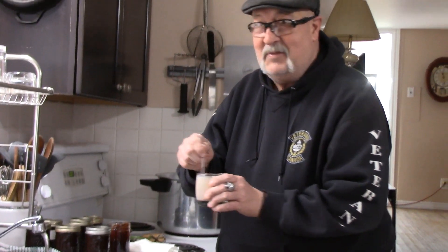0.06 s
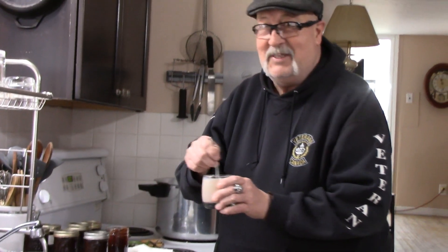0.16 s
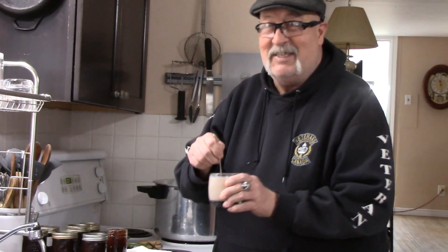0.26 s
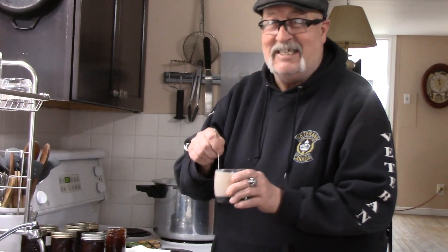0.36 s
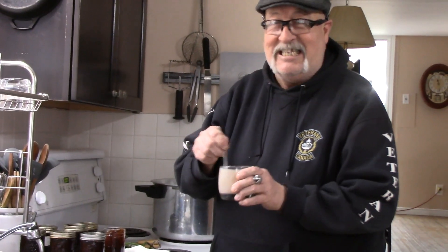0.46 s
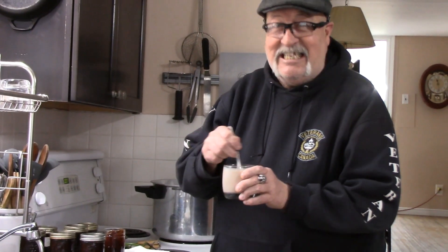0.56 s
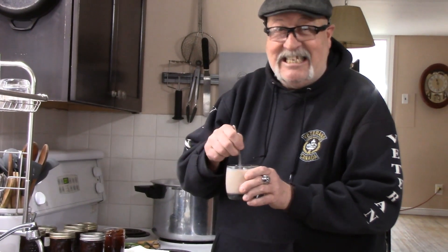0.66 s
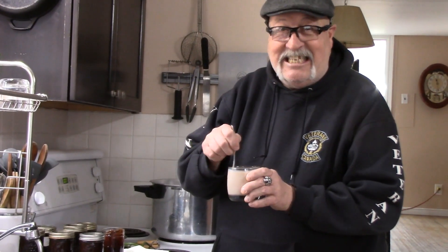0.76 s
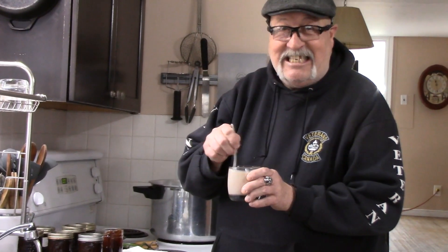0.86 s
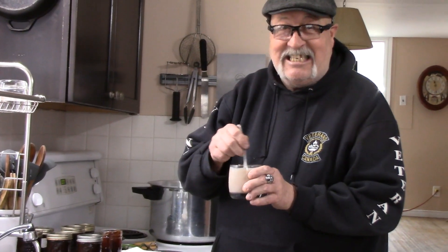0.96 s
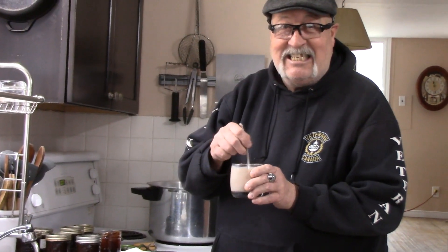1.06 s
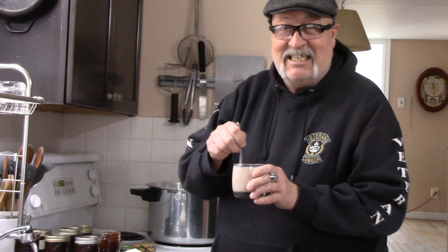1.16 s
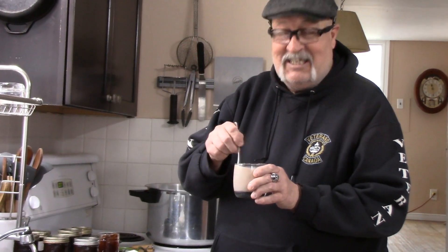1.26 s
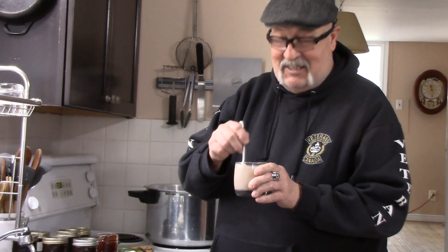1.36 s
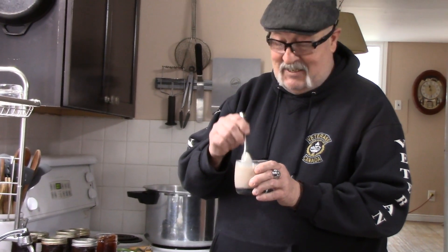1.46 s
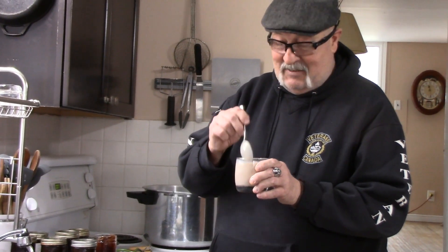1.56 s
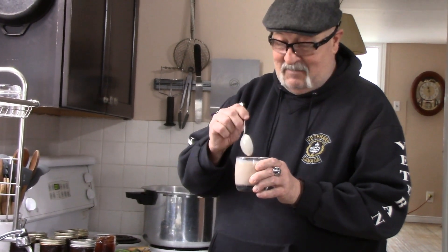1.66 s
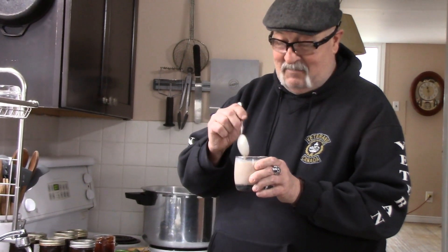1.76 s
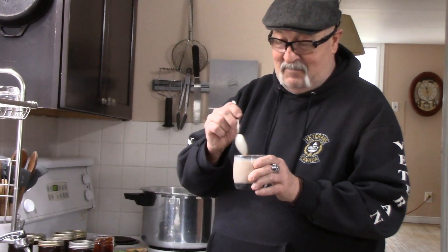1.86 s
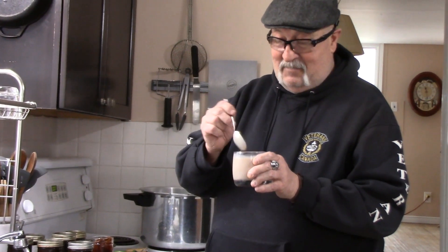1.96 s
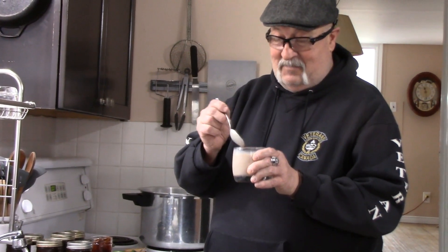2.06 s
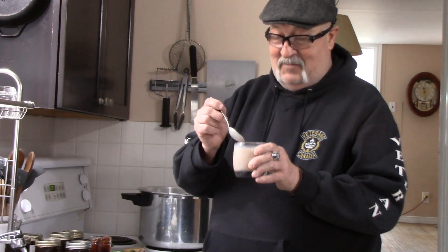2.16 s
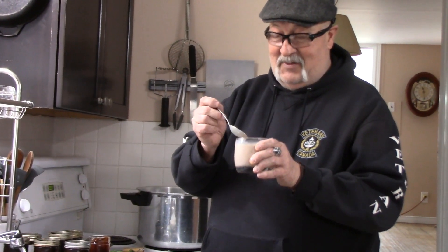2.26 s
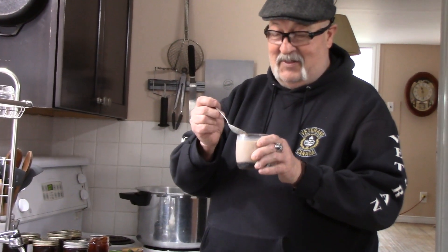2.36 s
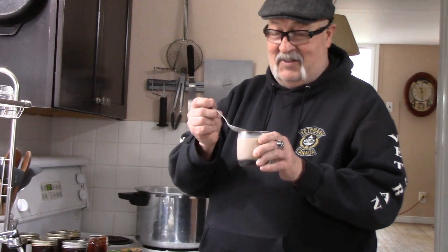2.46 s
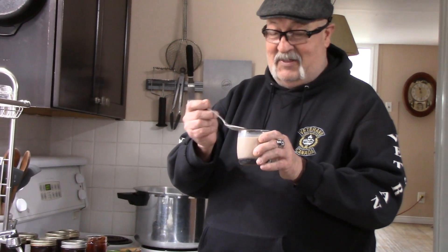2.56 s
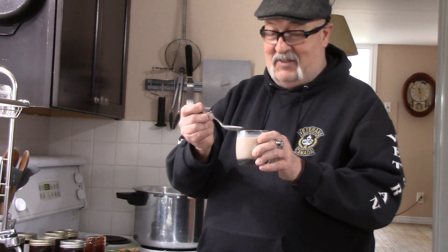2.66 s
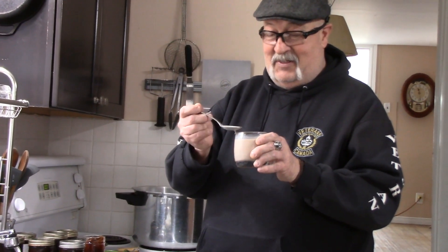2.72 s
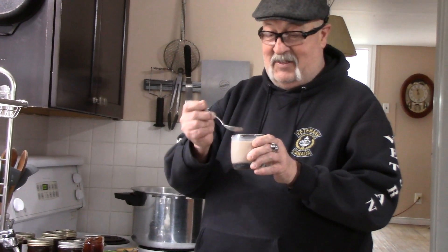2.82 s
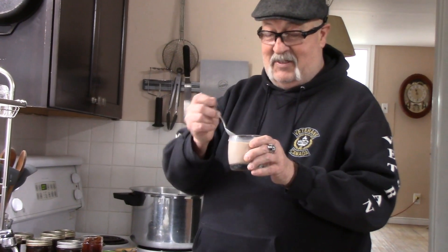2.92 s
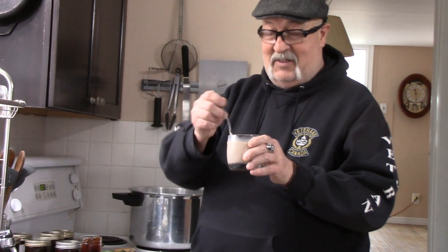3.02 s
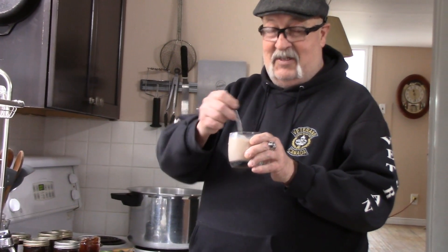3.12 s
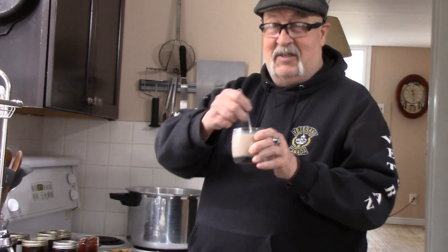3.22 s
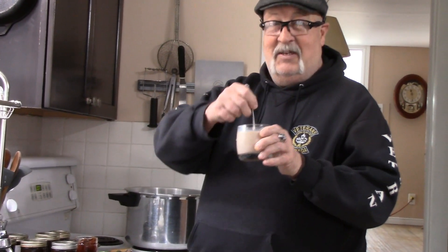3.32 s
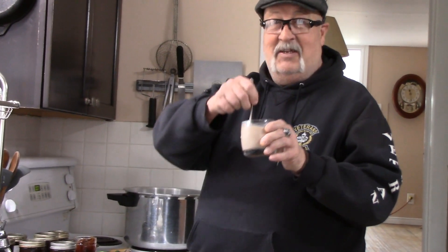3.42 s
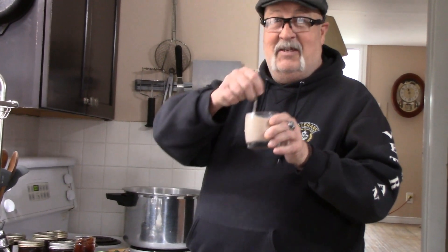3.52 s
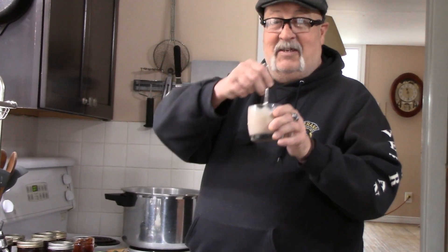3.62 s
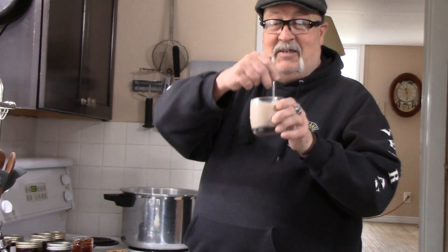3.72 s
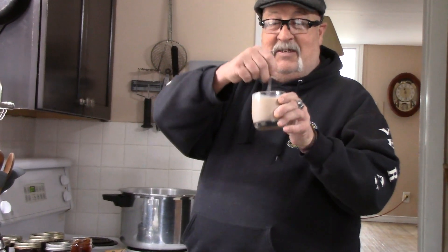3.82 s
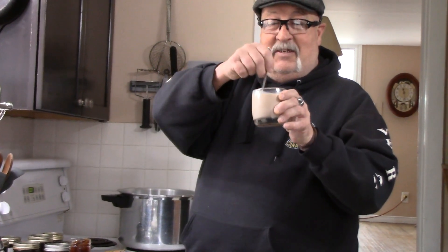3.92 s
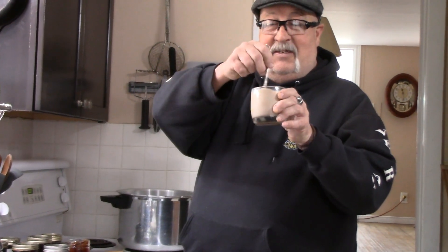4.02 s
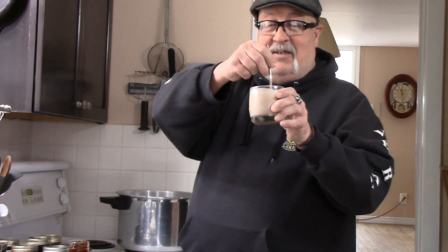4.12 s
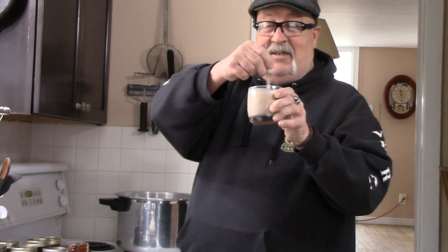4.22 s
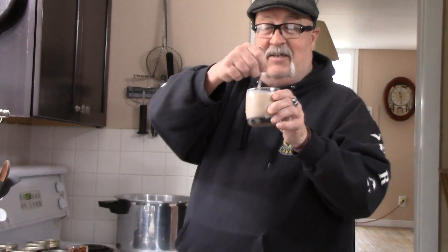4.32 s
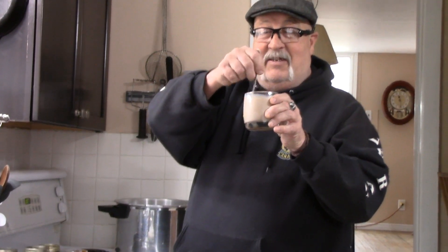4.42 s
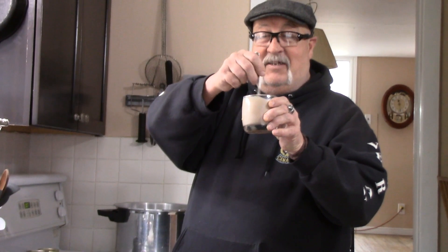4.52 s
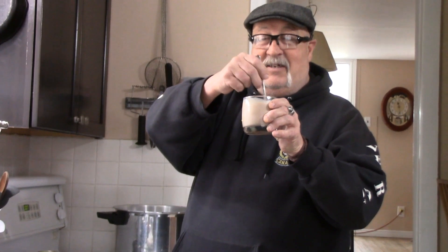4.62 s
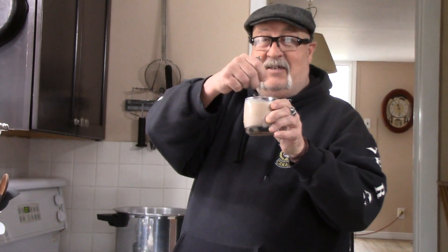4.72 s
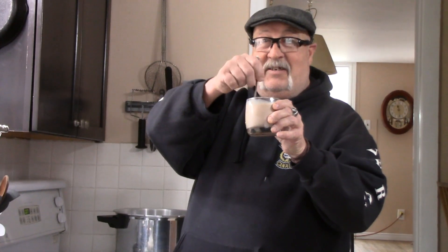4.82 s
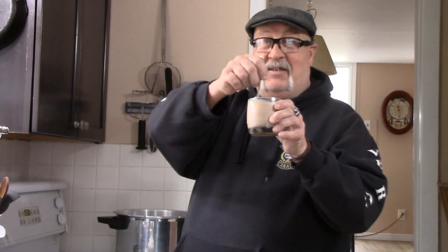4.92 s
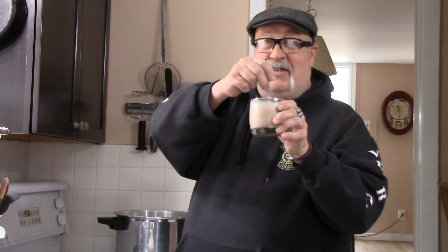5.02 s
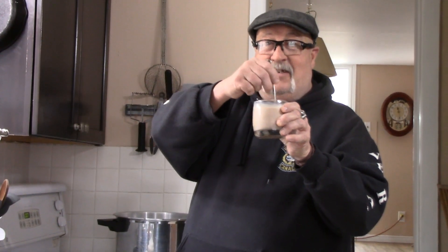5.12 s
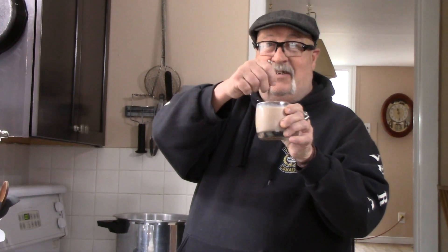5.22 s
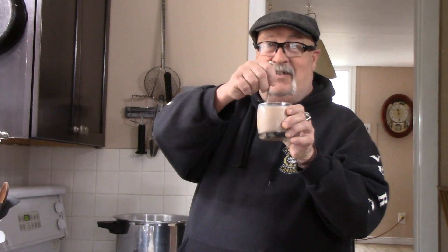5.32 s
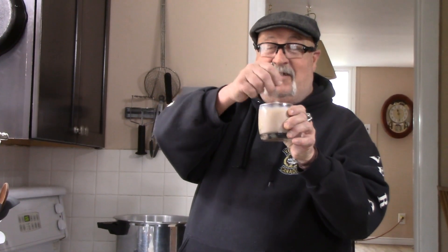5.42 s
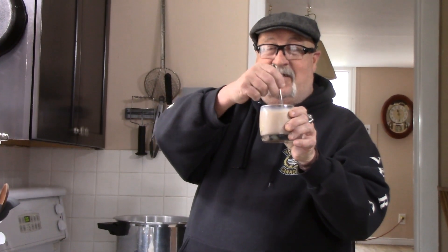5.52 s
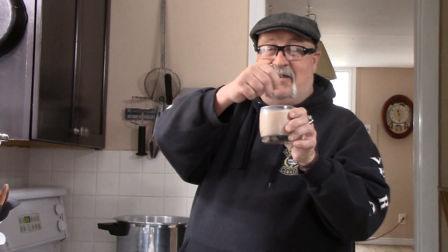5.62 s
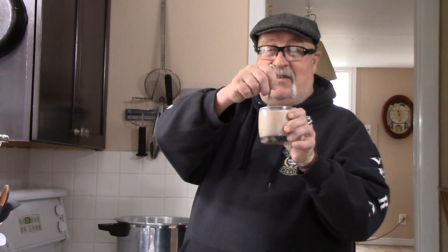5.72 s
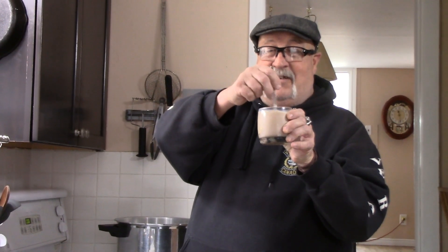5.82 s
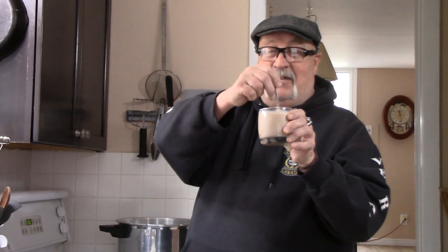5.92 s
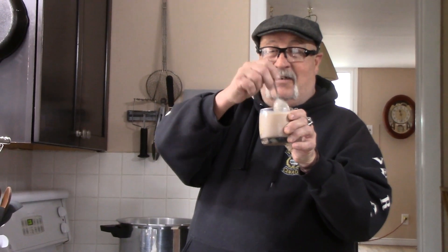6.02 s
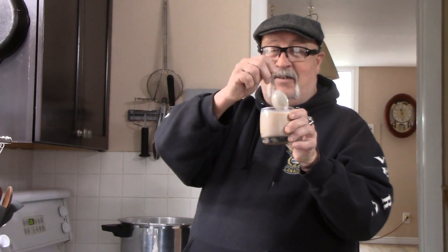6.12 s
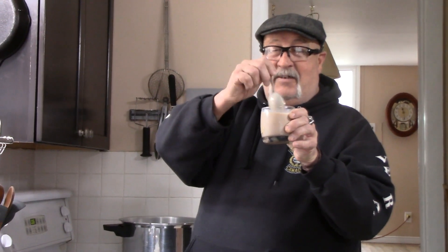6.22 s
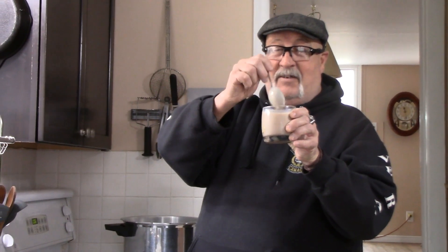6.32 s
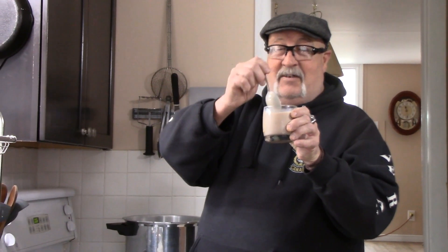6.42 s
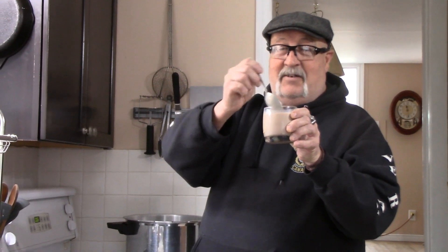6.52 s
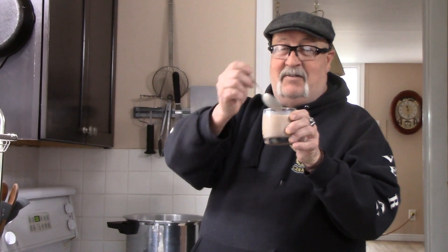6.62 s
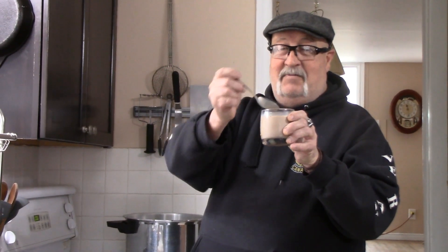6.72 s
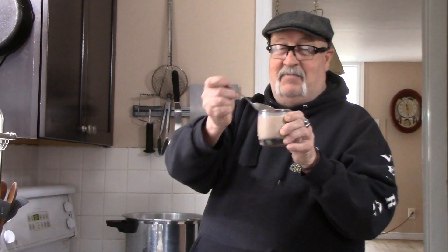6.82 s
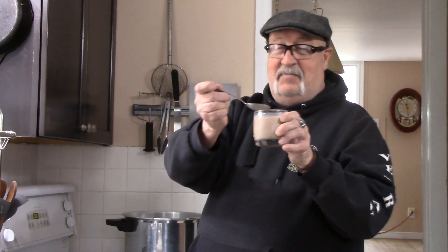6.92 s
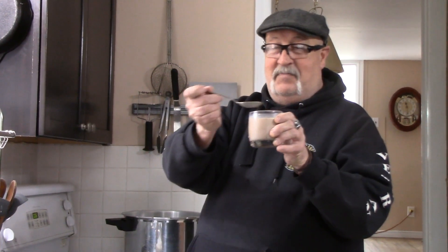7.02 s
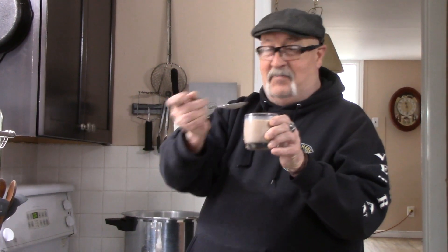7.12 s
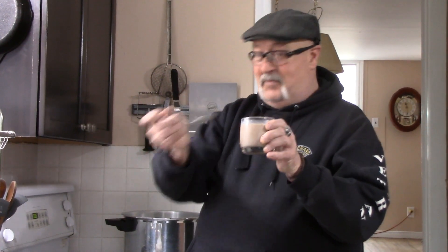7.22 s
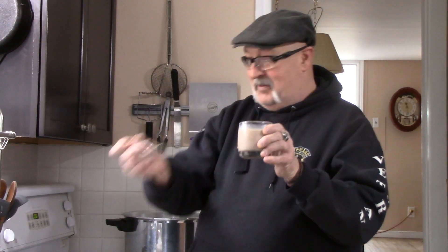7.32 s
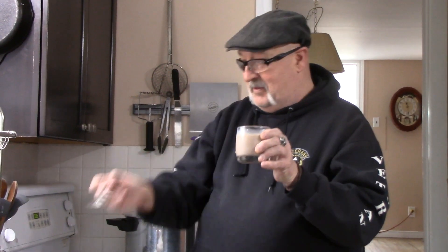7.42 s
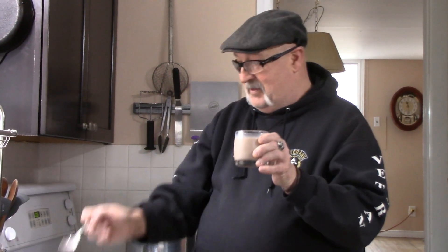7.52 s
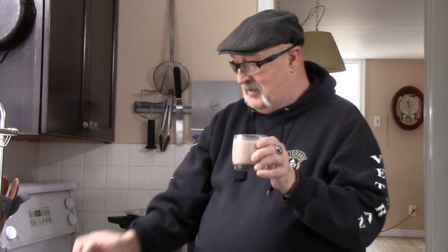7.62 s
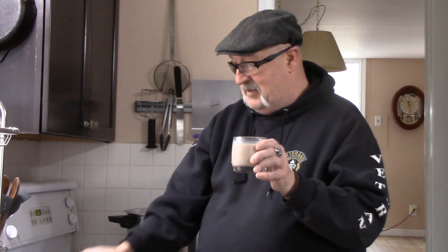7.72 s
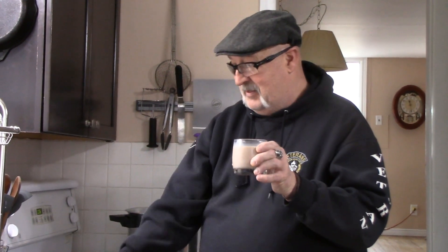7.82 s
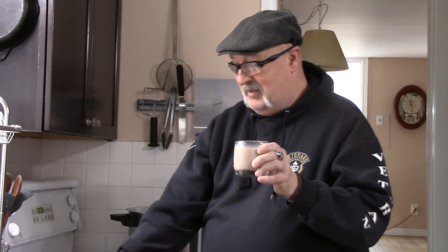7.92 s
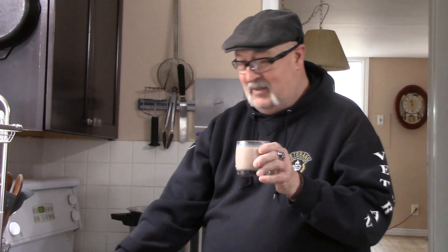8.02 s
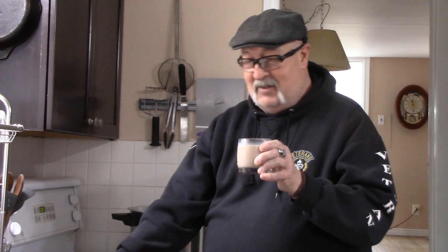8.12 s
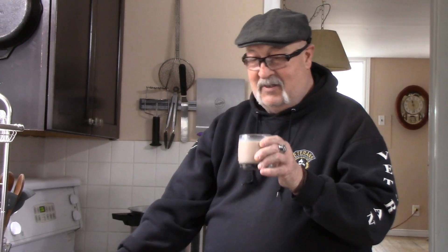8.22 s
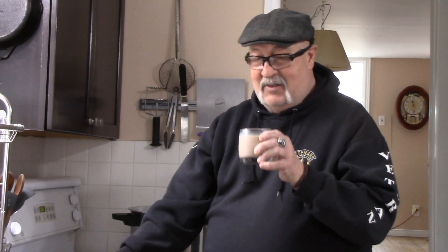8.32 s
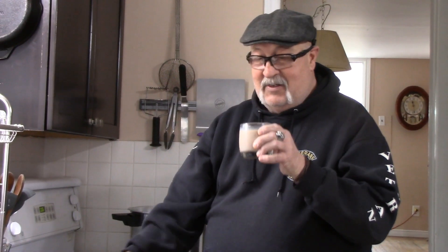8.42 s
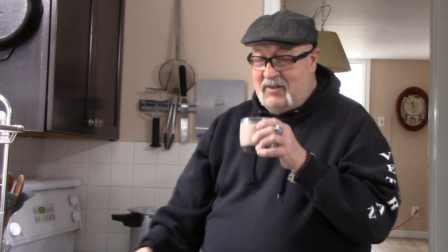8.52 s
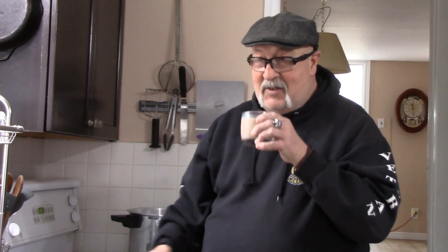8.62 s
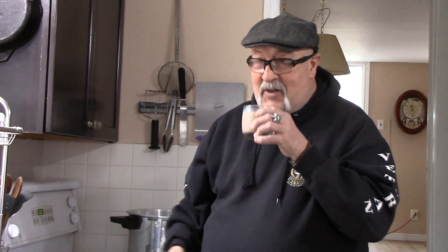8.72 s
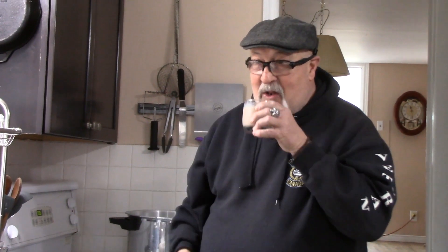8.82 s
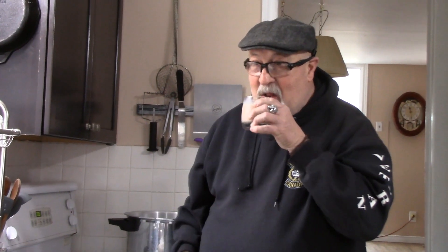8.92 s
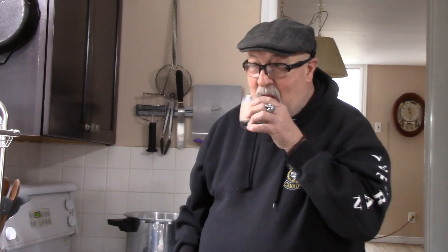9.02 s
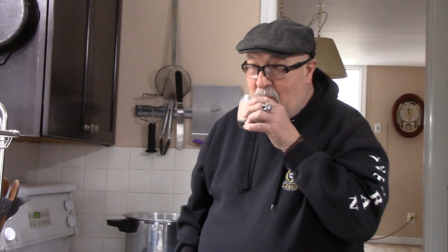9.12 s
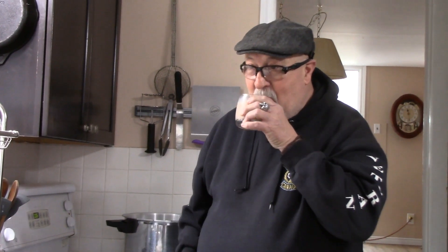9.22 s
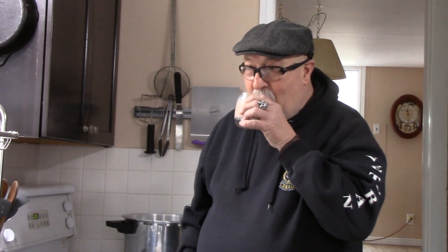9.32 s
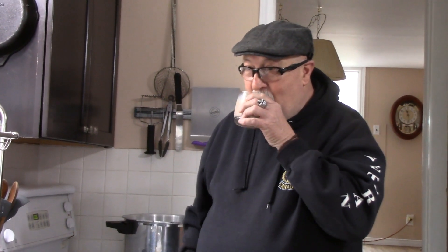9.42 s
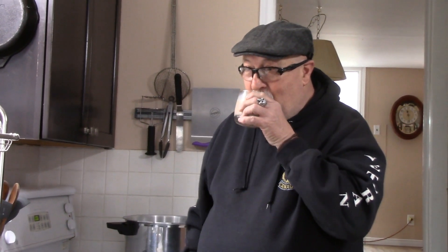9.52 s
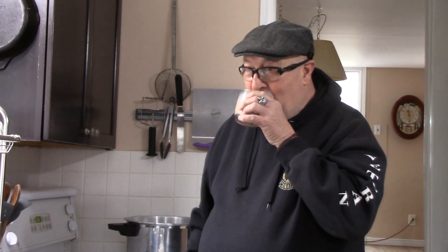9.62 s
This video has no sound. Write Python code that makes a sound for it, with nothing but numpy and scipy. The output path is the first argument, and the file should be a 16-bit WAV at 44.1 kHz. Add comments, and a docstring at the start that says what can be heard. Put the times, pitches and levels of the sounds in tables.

```python
"""A small, hard kitchen, heard from close by on a stereo pair of microphones; an appliance hums throughout.
A metal spoon stirs a milky drink in a hand-held glass, clinking against the wall, then lifts out
and taps the glass, which rings a little higher whenever the spoon leaves the liquid. A longer stir
and one more tap follow. At last the spoon is tossed into a steel sink, where it bounces, booms the
basin and rattles to rest."""
import sys
import numpy as np
from scipy import signal
from scipy.fft import rfft, irfft
from scipy.io import wavfile

SR = 44100
rng = np.random.default_rng(int(sys.argv[2]) if len(sys.argv) > 2 else 0)


def store_pcm(level_fs):
    """Save levels as 16-bit WAV."""
    pcm = np.round(np.clip(level_fs, -1, 1) * 32767).astype(np.int16)
    wavfile.write(sys.argv[1], SR, np.atleast_2d(pcm).T)


N = 426006
AGE = np.arange(SR * 3 // 5) / SR  # time since a blow, s
BLOW_SAMPLES = SR * 2 // 25  # the first 80 ms of a blow

# spoon on glass: start_s, blow_db, ring_over_blow_db, hardness_db_per_octave,
# height (-1 foot to 1 rim), lifted (0 deep in the drink to 1 clear of it)
CLINKS = [(0.2021, -31, 1, 1.9, -0.24, 0.14), (0.42, -40.5, -1.5, 1.5, 0.55, 0.04),
          (0.6073, -30.5, 5.5, -0.7, .1, 0.09), (0.7637, -55.5, 4, -12, 0.64, 0),
          (0.885, -46, 1, 2.5, -0.96, 0.02), (1.0494, -28.5, -0.5, 1.3, -.25, 0.3),
          (2.3343, -35.5, 2.5, -4, .2, .9), (2.8568, -28.5, 2, -2.5, 0.74, 0.97),
          (3.317, -30.5, 1, -2.1, -0.75, 1), (3.7894, -34, 3, 0.8, 0.045, 0.39),
          (3.9684, -32.5, -8.5, 2, .52, 0.53), (4.0176, -41, 0.5, -1.5, 0, 0.56),
          (4.2371, -49, 1.5, -1.5, -0.72, 0.57), (4.4331, -35, -2, 0, 0.16, 0.05),
          (4.6771, -35.5, -7, 3.5, -0.12, 0.35), (4.88, -50, 6, -6, -.65, 0.01),
          (5.1364, -35.5, -5, -1, -0.26, 0), (5.3654, -31.5, 6.5, -0.75, 0.29, 0.55),
          (5.563, -34.5, -8, 4.5, -0.25, .2), (5.7651, -37, 0, 4, 0.9, 0.02),
          (6.7327, -30, 5.5, -1.4, -0.015, 0.97)]


def amp(db):
    """Decibels to gain."""
    return 10 ** (np.asarray(db) / 20)


def unit(x):
    """Scales to rms 1."""
    return x / np.sqrt(np.mean(x ** 2) + 1e-20)


def decay(t60_s, t=AGE):
    """An envelope that falls 60 dB in t60_s."""
    return np.exp(-np.log(1000) * t / t60_s)


def curve_at(points, hz):
    """Reads rows of frequency_hz, value on a log-frequency axis."""
    point_hz, value = np.transpose(points)
    return np.interp(np.log(hz + 1), np.log(point_hz + 1), value)


def add(mix, start_s, sound):
    """Adds a stereo sound to the mix at start_s."""
    part = mix[:, round(start_s * SR):][:, :sound.shape[1]]
    part += sound[:, :part.shape[1]]


def ring(modes, rise_s=0.0018, spot_db=0):
    """Dying sines of pitch_hz, level_db, t60_s; the spot struck sets each one's sign and share."""
    shares = rng.choice([-1, 1], len(modes)) * amp(spot_db * rng.standard_normal(len(modes)))
    sines = sum(share * amp(db) * decay(t60_s) * np.sin(2 * np.pi * hz * AGE)
                for share, (hz, db, t60_s) in zip(shares, modes))
    return sines * (1 - np.exp(-AGE / rise_s))


def knock(colour, t60_s, grain_db):
    """A sharp contact and a brief dense buzz, coloured by rows of frequency_hz, level_db."""
    blow = amp(grain_db) * unit(rng.standard_normal(len(AGE)) * decay(t60_s)) / np.sqrt(len(AGE))
    blow[0] += 1
    log_gain = np.log(amp(curve_at(colour, abs(np.fft.fftfreq(2048, 1 / SR)))))
    minimum_phase = np.fft.ifft(np.exp(np.conj(signal.hilbert(log_gain)))).real
    return signal.oaconvolve(blow, minimum_phase)[:len(AGE)]


def microphone_pair(mid, side, width, wide_db=0):
    """Two close microphones hear nearly the same, most alike in the low middle."""
    side_db = wide_db + curve_at(width, np.fft.rfftfreq(len(side), 1 / SR))
    side = irfft(rfft(side) * amp(side_db), len(side))
    return np.array([mid + side, mid - side])


def kitchen(direct_db, early_db, early_s=0.014, wide_db=0):
    """One path to the microphones: direct sound, close cupboards and tiles, then the room's tail."""
    # reverberation of the kitchen: frequency_hz, t60_s
    reverb_times = [(150, 0.82), (300, 0.87), (600, 0.3), (1500, 0.38), (4000, 0.36), (8000, 0.31),
                    (15000, 0.1)]
    # stereo width of the echoes: frequency_hz, side_over_mid_db
    echo_width = [(60, -25), (300, -38), (700, -25), (2000, -19.5), (8000, -14), (15000, -20.5)]
    hz, t, spectra = signal.stft(rng.standard_normal((2, len(AGE))), SR, nperseg=256)
    spectra *= decay(curve_at(reverb_times, hz)[:, None], t)
    tail = signal.istft(spectra, SR, nperseg=256)[1][:, :len(AGE)]
    echoes = rng.standard_normal(tail.shape) * (rng.random(tail.shape) < 2500 / SR)  # 2500 a second
    early = echoes * np.exp(-AGE / early_s)
    mid, side = (unit(tail) + amp(early_db) * unit(early)) / np.sqrt(len(AGE))
    mid[0] += amp(direct_db)
    return microphone_pair(mid, side, echo_width, wide_db)


def heard(sound, path, level_db):
    """A sound carried along a path to the microphones, at level_db over its first 80 ms."""
    wet = signal.fftconvolve(sound[None], path, axes=1)[:, :len(AGE)]
    return amp(level_db) * wet / np.sqrt(np.mean(wet[:, :BLOW_SAMPLES] ** 2))


def appliance(air_db=-53, hum_db=-1, waver=0.33):
    """The room tone: steady fan noise with faintly wavering motor and mains tones."""
    # fan and room air: frequency_hz, relative_density_db
    air_spectrum = [(20, -37), (62, -21.5), (145, -13.5), (190, -5.5), (285, -6), (330, 3.5), (385, -7),
                    (800, -10), (1200, -15), (4300, -26.5), (6500, -28), (10500, -35), (16000, -42.5)]
    # stereo width of the air: frequency_hz, side_over_mid_db
    air_width = [(60, -9), (350, -15.5), (800, -11.5), (4400, -8.5), (15000, -16.5)]
    # motor tones: pitch_hz, level_over_hum_db
    motor_tones = [(204.6, -73.5), (258.4, -63), (360.7, -59.5), (829.0, -67), (1324, -71.5), (2848, -82),
                   (3025, -78.5), (6465, -80.5)]
    mains_tone = (119, -72)
    t, hz = np.arange(N) / SR, np.fft.rfftfreq(N, 1 / SR)
    mid, side = irfft(rfft(rng.standard_normal((2, N))) * amp(curve_at(air_spectrum, hz)), N)
    out = amp(air_db) * unit(microphone_pair(mid, side, air_width))
    knots_s = np.linspace(0, t[-1], 40)
    for pitch_hz, db in [*motor_tones, mains_tone]:
        swell, drift = (np.interp(t, knots_s, row) for row in rng.standard_normal((2, len(knots_s))))
        tone = np.sin(2 * np.pi * (pitch_hz * t + waver * drift / 2))
        out += amp(hum_db + db) * unit((1 + waver * swell) * tone)
    return out


def stirring(strokes_per_s=2.6, between_strokes_db=-12, settle_db_per_s=5, die_db_per_s=38.5):
    """Churning peaks in mid-stroke, calms as the drink turns with the spoon and dies when it stops."""
    # spells of stirring: start_s, end_s, churn_db (before the dips and the calming)
    spells = [(0, 1.15, -58.5), (3.22, 5.948, -51)]
    t, strength = np.arange(N) / SR, np.zeros(N)
    for start_s, end_s, churn_db in spells:
        stroke_db = between_strokes_db * np.cos(np.pi * strokes_per_s * (t - start_s)) ** 2
        calm_db = settle_db_per_s * np.maximum(t - start_s, 0) + die_db_per_s * np.maximum(t - end_s, 0)
        strength += (t >= start_s) * amp(churn_db + stroke_db - calm_db)
    return strength


def liquid(bubbles_per_s=220, bubble_hz=680, t60_cycles=18, shove_db=-20, lifted_db=-5):
    """The spoon churns up small, damped bubbles and shoves the drink at each blow."""
    # dull knock of the liquid: frequency_hz, relative_db
    shove_colour = [(60, -29), (300, -13), (550, -4), (1100, -1.5), (1600, -25.5), (4000, -43)]
    room = kitchen(direct_db=-2.5, early_db=-6.5)
    churn = np.zeros(N)
    pitches_hz = bubble_hz * 2 ** np.linspace(-0.7, 0.7, 14)
    for hz in pitches_hz:
        births = (rng.random(N) < bubbles_per_s / len(pitches_hz) / SR) * rng.uniform(0.3, 1, N)
        bubble = ring([(hz, 0, t60_cycles / hz)])[:BLOW_SAMPLES]
        churn += signal.oaconvolve(births, bubble)[:N]
    out = unit(signal.oaconvolve(churn[None], room, axes=1)[:, :N]) * stirring()
    for start_s, blow_db, *_, lifted in CLINKS:
        shove = knock(shove_colour, t60_s=0.034, grain_db=3)
        # a lifted spoon moves less of the drink
        add(out, start_s, heard(shove, room, blow_db + shove_db + lifted_db * lifted))
    return out


def touches(ring_t60_s=0.01, ring_db=-1, tick_db=-3, contact_s=0.001):
    """Grazing contacts of the spoon: a soft-edged tick and one short, damped ring."""
    # light touches: start_s, touch_db, pitch_hz
    grazes = [(0.0265, -54.5, 6000), (0.877, -47, 5880), (1.02, -49, 2330), (1.2321, -42.5, 5670),
              (1.387, -62, 2260), (1.6009, -56, 3090), (3.476, -52.5, 5680), (4.2422, -43, 5190),
              (4.442, -38, 1470), (4.5308, -49, 2340), (4.9916, -56, 2360), (5.185, -52, 6000),
              (6.537, -59.5, 5200), (8.028, -49.5, 2193)]
    # spectrum of the tick: frequency_hz, relative_db
    tick_colour = [(60, -48), (300, -32.5), (1200, 1), (2400, 5), (6000, -6.5), (10000, -6.5),
                   (16000, -25.5)]
    out = np.zeros((2, N))
    for start_s, touch_db, pitch_hz in grazes:
        room = kitchen(direct_db=-2, early_db=-3.5, early_s=0.007)
        tick = knock(tick_colour, t60_s=0.017, grain_db=-4.5) * (1 - np.exp(-AGE / contact_s))
        add(out, start_s, heard(tick, room, touch_db + tick_db))
        add(out, start_s, heard(ring([(pitch_hz, 0, ring_t60_s)]), room, touch_db + ring_db))
    return out


def sink(thump_db=-12, boom_db=5.5, ring_db=2, crack_db=-1, brighten=0.5, choke_at_s=10, choke_s=0.012):
    """Every bounce thumps and booms the basin, rings the free spoon and sets the sheet steel buzzing."""
    # the spoon's landings: start_s, force_db, angle_deg (0 flat to 90 end-on)
    bounces = [(8.145, -19, 7.8), (8.183, -25.5, 8), (8.213, -22, 8.7), (8.266, -28.5, 12),
               (8.291, -30.5, 22), (8.333, -17.5, 76.4), (8.364, -18.5, 58), (8.398, -24, 80),
               (8.418, -18.5, 68), (8.440, -24, 10), (8.474, -24.5, 7.2), (8.497, -37, 11),
               (8.523, -32, 3.4)]
    # modes of the basin's floor, the steel basin and the loose spoon: pitch_hz, relative_db, t60_s
    floor_modes = [(75, -21.5, 0.11), (193, -18.5, .3), (249, -11.5, 0.27), (316.3, 0, 0.14), (355, 5, .1),
                   (422, 4.5, 0.11)]
    basin_modes = [(702, -1, .14), (752, -1, .16), (785, 4, .12), (811, 5, .12), (882, 2.5, .13),
                   (930, 2, .12), (1069, -6, .19), (1222, -9, .19), (1394, -9, .22), (1580, -10, .15),
                   (2158, -5, .1)]
    spoon_modes = [(2424, -13, .25), (2680, -7, .2), (2720, -12, .2), (2800, -15, .2), (3306, -13, .25),
                   (3634, 4, .15), (5200, -7, .16), (6880, -19, .12), (8220, -2.5, .11), (10630, -12, .14),
                   (13020, -16, .06)]
    # dense short modes of the sheet steel: frequency_hz, relative_db
    crack_colour = [(20, -45.5), (55, -29), (110, -19.5), (220, -5.5), (400, -3), (520, 5), (780, 14),
                    (1300, 2), (2500, 6), (4200, -1), (6500, -2), (10000, -7.5), (13000, -9), (16000, -19)]
    out = np.zeros((2, N))
    hardest_db = max(force_db for _, force_db, _ in bounces)
    for start_s, force_db, angle_deg in bounces:
        room = kitchen(direct_db=-9, early_db=-3.5, early_s=0.023)
        facing = kitchen(direct_db=2, early_db=3.5, early_s=0.0049)
        thump = ring(floor_modes, rise_s=0.002, spot_db=4)
        add(out, start_s, heard(thump, facing, force_db + thump_db))
        # a flat landing drives the basin, an end-on one the spoon
        flat, end_on = np.cos(np.radians(angle_deg)), np.sin(np.radians(angle_deg))
        boom = ring(basin_modes, rise_s=0.0016, spot_db=4.5)
        add(out, start_s, flat * heard(boom, facing, force_db + boom_db))
        # softer blows leave the high modes quiet
        tilt_db = brighten * (force_db - hardest_db)  # per octave
        modes = [(hz, db + tilt_db * np.log2(hz / spoon_modes[0][0]), t60_s)
                 for hz, db, t60_s in spoon_modes]
        # the choke lies beyond the scene's end, so every ring dies freely
        free = np.exp(-np.maximum(AGE - max(choke_at_s - start_s, 0), 0) / choke_s)
        spoon = ring(modes, rise_s=0.0006, spot_db=4.5) * free
        add(out, start_s, end_on * heard(spoon, facing, force_db + ring_db))
        crack = knock(crack_colour, t60_s=0.065, grain_db=5.5)
        add(out, start_s, heard(crack, room, force_db + crack_db))
    return out


def glass(twin_split=0.011, twin_db=-3, twin_t60_s=0.066, clack_tilt=0.3, radiate_hz=900):
    """Each clink rings the glass wall's modes over the clack and ping of the held spoon."""
    # a soft contact leaves the spoon leaning on the wall, damping the lowest mode: level_db, t60_s
    leaning = [(-47, 0.038), (-15.5, 0.11)]
    # middle wall modes: ratio_to_second_mode, t60_s, relative_db, rim_gain_db
    middle_modes = [(1.003, 0.12, -1, -8.5), (1.669, 0.085, -3.5, 6), (2.514, 0.046, -4, 2.5)]
    # high wall modes: ratio_to_second_mode, relative_db, t60_s
    high_modes = [(3.2, -20, .008), (3.359, -30.5, 0.0067), (3.45, 8.5, 0.0072), (3.95, -5.5, 0.025),
                  (4.06, 7.5, 0.005), (4.58, -10.5, .012), (5.06, -6.5, 0.009)]
    # the damped spoon's clack: frequency_hz, relative_db
    clack_colour = [(60, -58), (400, -22), (950, -22), (1350, -5), (1750, 7.5), (1950, 5.5), (2150, 5.5),
                    (2750, 1), (3150, 5), (3600, -1), (5000, -3.5), (7000, -9), (11000, -15),
                    (16000, -18.5)]
    # ping of the spoon's handle: pitch_hz, level_over_blow_db, t60_s
    handle_mode = (5150, -17.5, .025)
    immersed_hz, lift_rise = np.array([1633, 2362]), 0.0569  # two lowest modes; rise as the spoon lifts
    lowest_db, lowest_rim_db = 2, 2
    high_db, high_centre_hz = -7, 9000
    out = np.zeros((2, N))
    for start_s, blow_db, ring_db, hardness, height, lifted in CLINKS:
        # the wall faces the microphones; the spoon's clack scatters round the room
        facing = kitchen(direct_db=0.5, early_db=-2, early_s=0.017, wide_db=0.5)
        room = kitchen(direct_db=-7, early_db=-1.5, early_s=0.0077, wide_db=0.5)
        low_hz, second_hz = immersed_hz * (1 + lift_rise * lifted)
        wall_db = blow_db + ring_db
        low_db = wall_db + lowest_db + lowest_rim_db * height
        low_t60_s = np.interp(low_db, *np.transpose(leaning))
        add(out, start_s, heard(ring([(low_hz, 0, low_t60_s)], rise_s=0.004), facing, low_db))
        for ratio, t60_s, db, rim_db in middle_modes:
            hz = second_hz * ratio
            twin_hz = hz * (1 + twin_split * rng.choice([-1, 1]))  # split off by hand and liquid
            pair = ring([(hz, 0, t60_s), (twin_hz, twin_db, twin_t60_s)], rise_s=0.0011)
            # a hard contact favours the high modes; its height picks the rim's modes or the foot's
            pair_db = wall_db + db + rim_db * height + hardness * np.log2(hz / low_hz)
            add(out, start_s, heard(pair, facing, pair_db))
        modes = [(second_hz * ratio, db, t60_s) for ratio, db, t60_s in high_modes]
        sparkle_db = wall_db + high_db + hardness * np.log2(high_centre_hz / low_hz)
        add(out, start_s, heard(ring(modes, rise_s=0.0001, spot_db=2.5), room, sparkle_db))
        # the harder the contact, the brighter the clack
        colour = [(hz, db + clack_tilt * hardness * np.log2(max(hz / low_hz, 1)))
                  for hz, db in clack_colour]
        add(out, start_s, heard(knock(colour, t60_s=0.036, grain_db=-1), room, blow_db))
        add(out, start_s, heard(ring([handle_mode]), room, blow_db + handle_mode[1]))
    # a small glass radiates almost no bass
    return signal.sosfilt(signal.butter(2, radiate_hz, "high", fs=SR, output="sos"), out)


def scene():
    """All sources, a touch stronger in the left microphone."""
    balance = amp([[0.22], [-0.22]])
    return (glass() + liquid() + touches() + sink() + appliance()) * balance


def record(dry):
    """The recorder rounds off peaks near full scale and cuts the treble above 16 kHz."""
    rounded = dry / (1 + dry ** 6) ** (1 / 6)
    lowpass = signal.firwin(511, 16000, window=("kaiser", 9), fs=SR)
    return signal.oaconvolve(rounded, lowpass[None], "same")


dry = scene()
out = record(dry)
store_pcm(out)
```